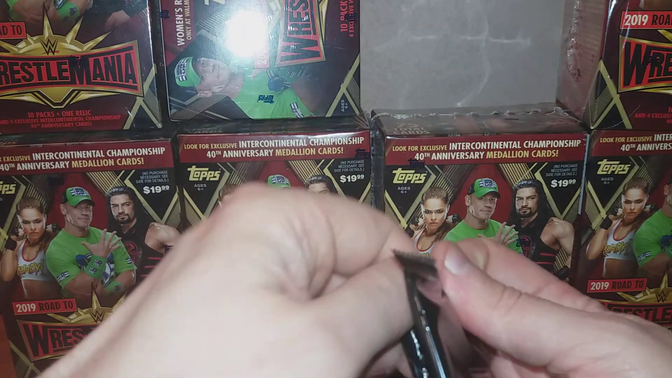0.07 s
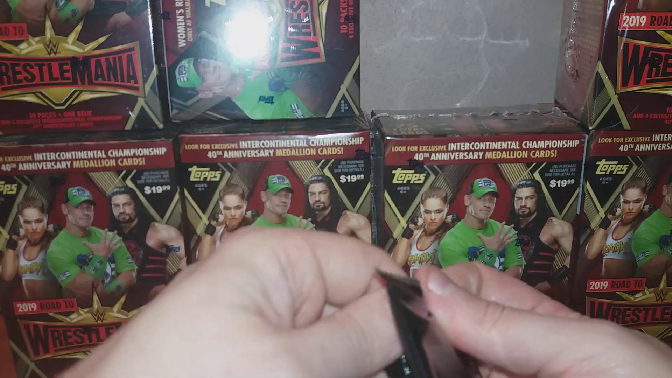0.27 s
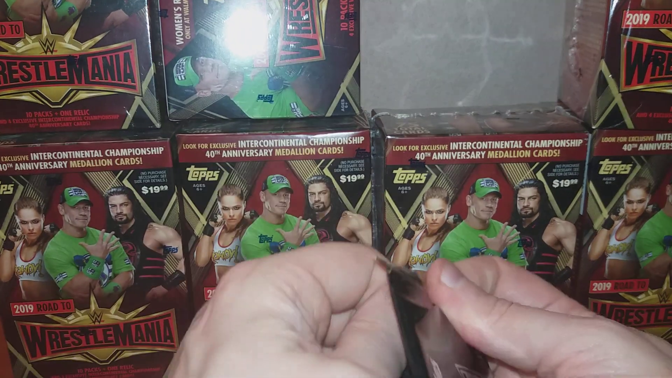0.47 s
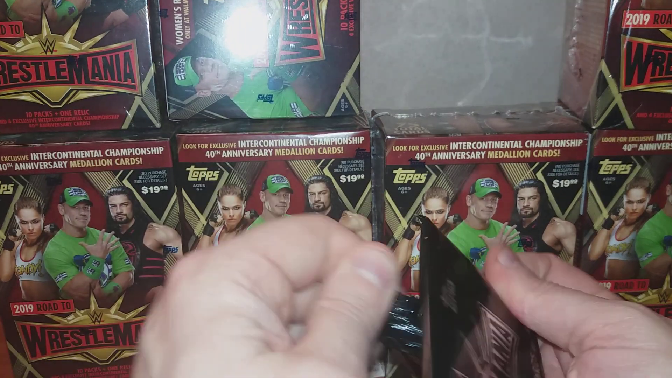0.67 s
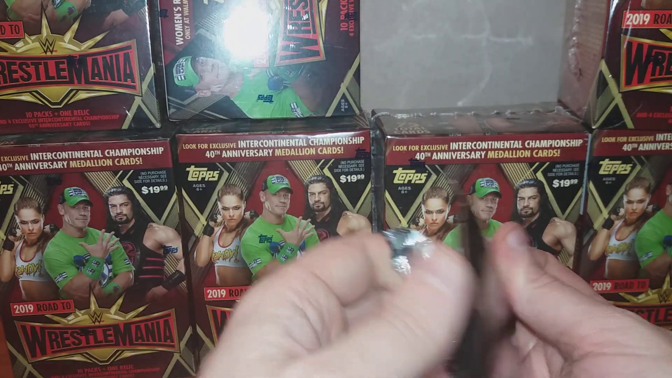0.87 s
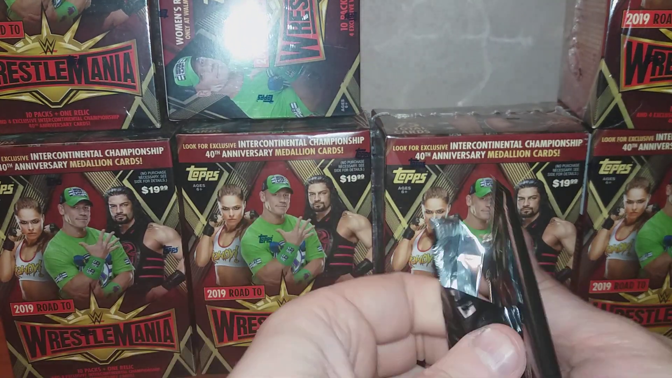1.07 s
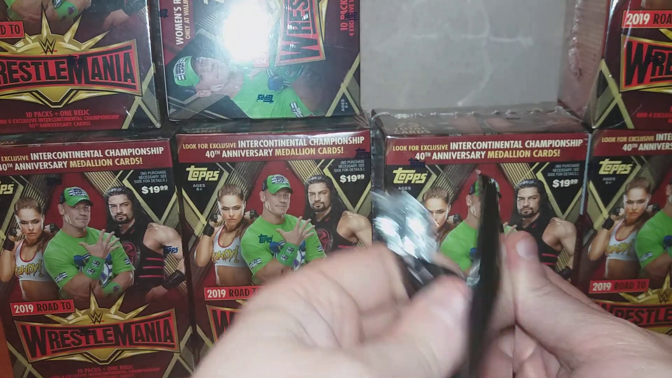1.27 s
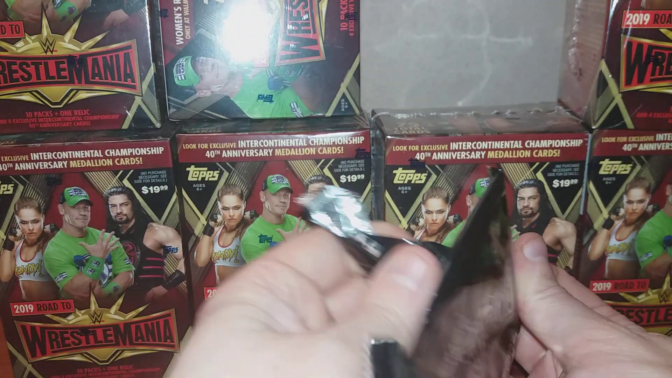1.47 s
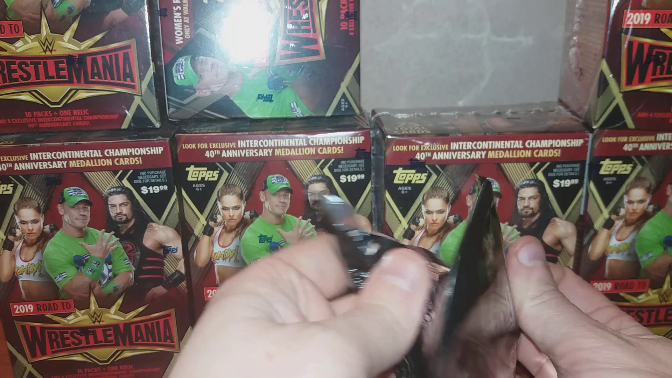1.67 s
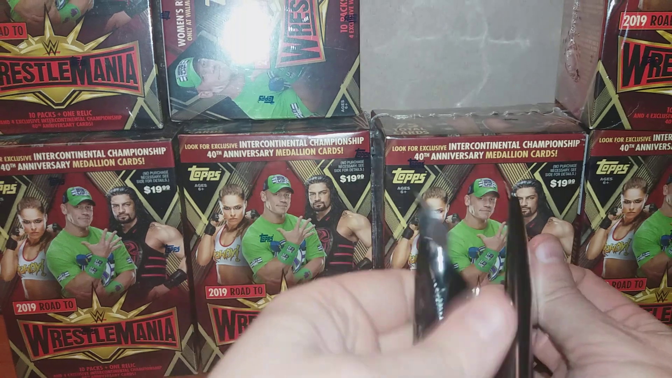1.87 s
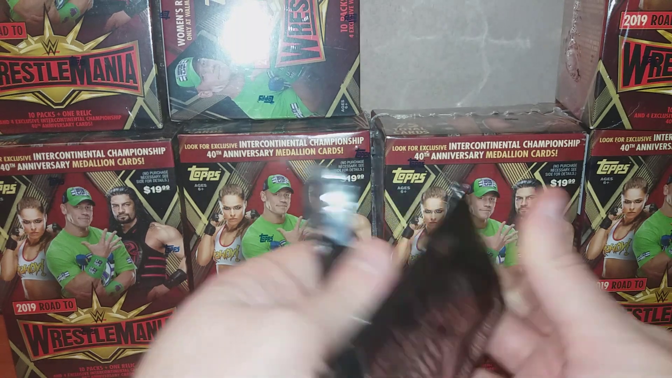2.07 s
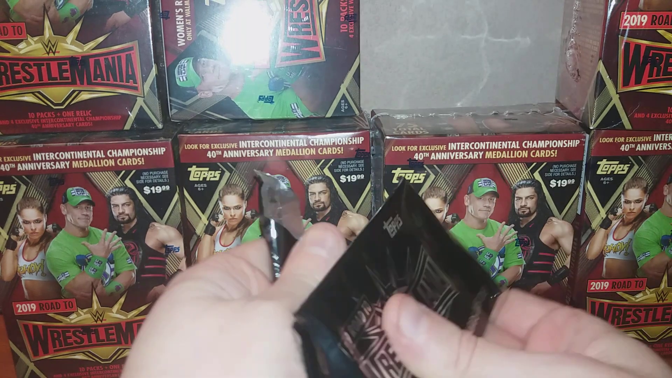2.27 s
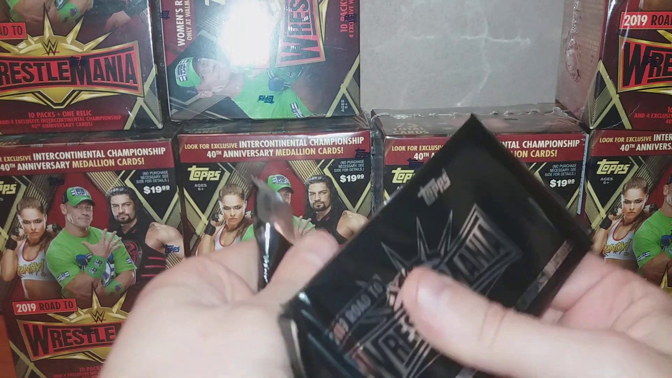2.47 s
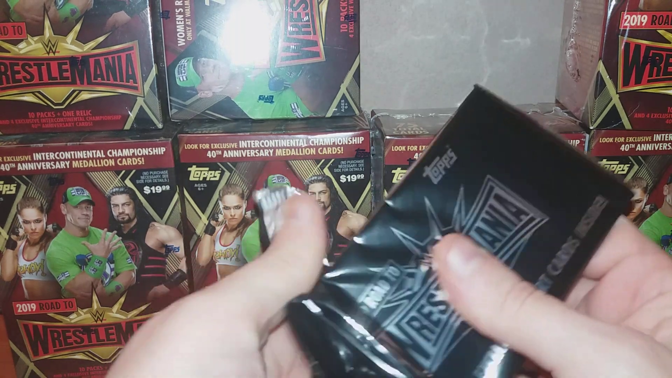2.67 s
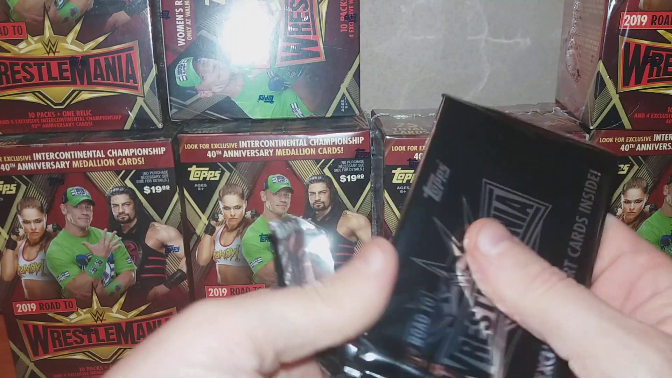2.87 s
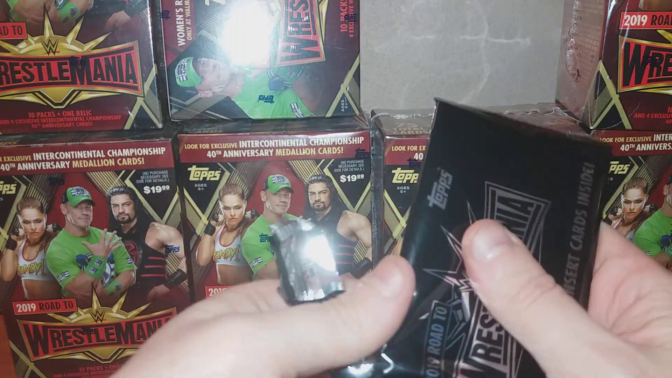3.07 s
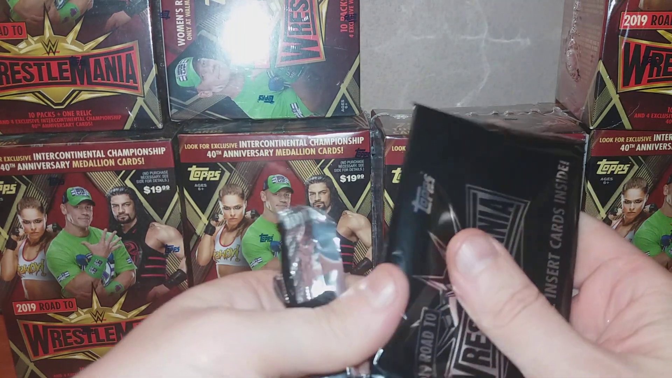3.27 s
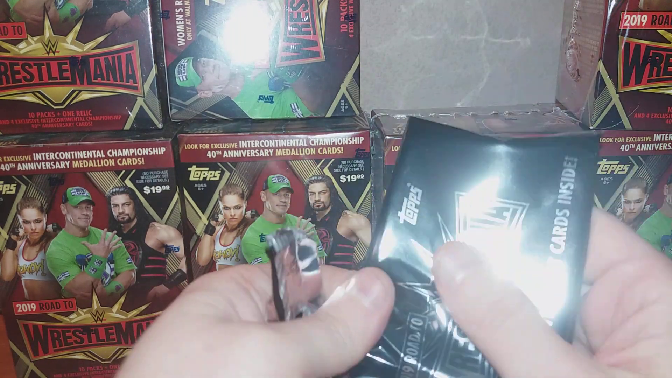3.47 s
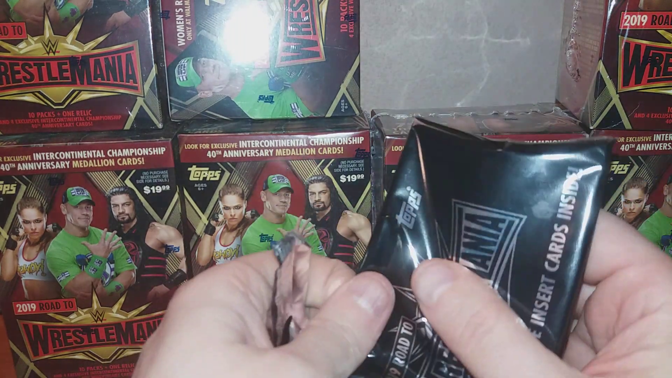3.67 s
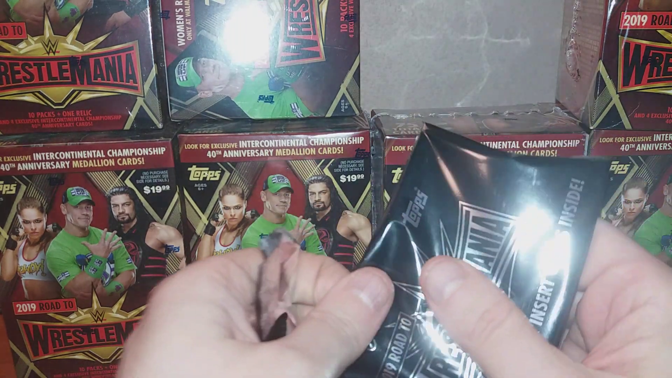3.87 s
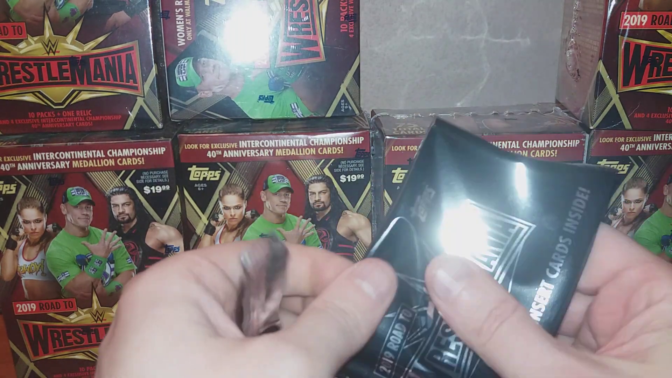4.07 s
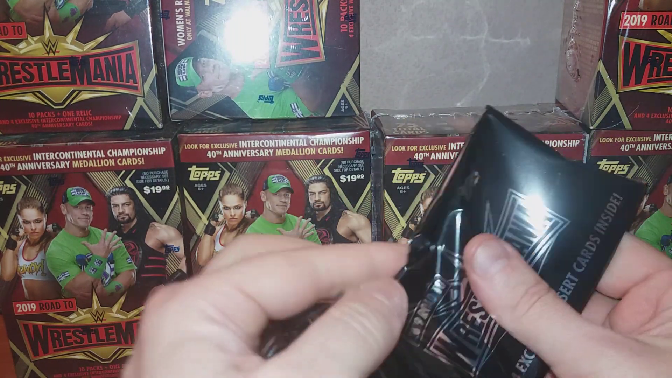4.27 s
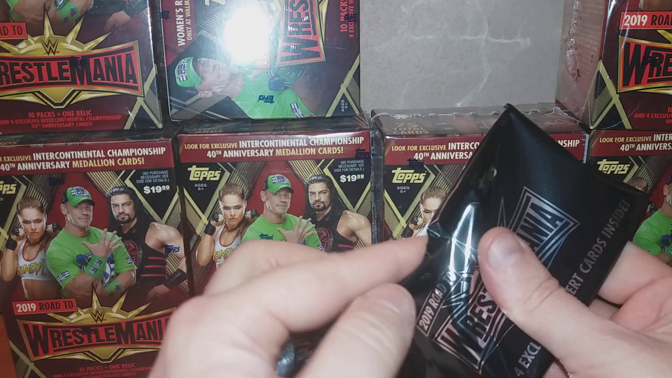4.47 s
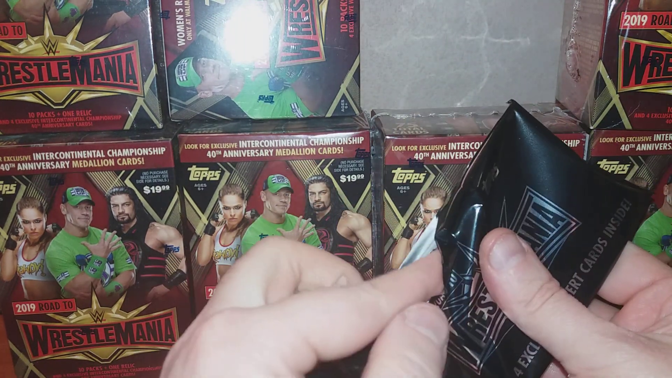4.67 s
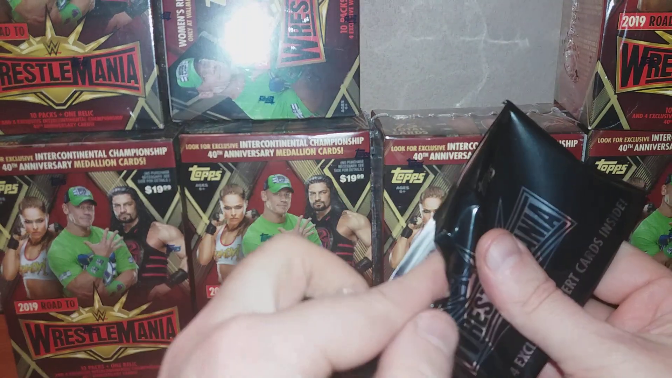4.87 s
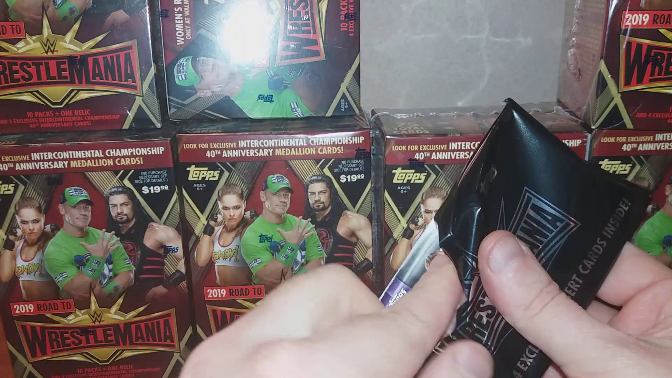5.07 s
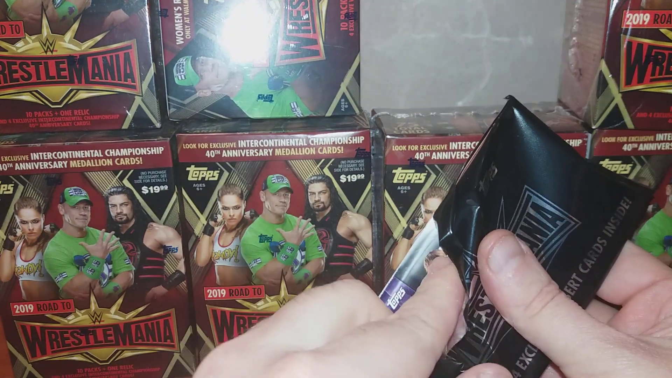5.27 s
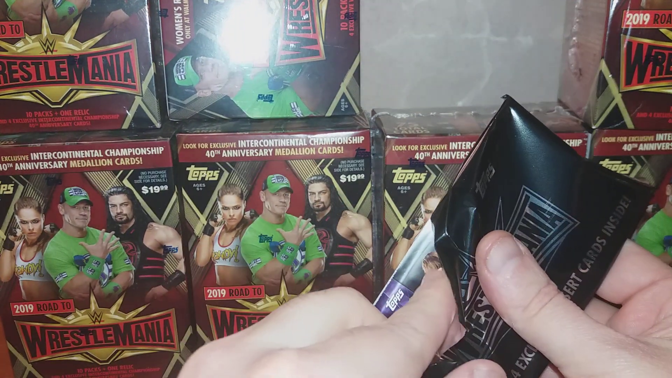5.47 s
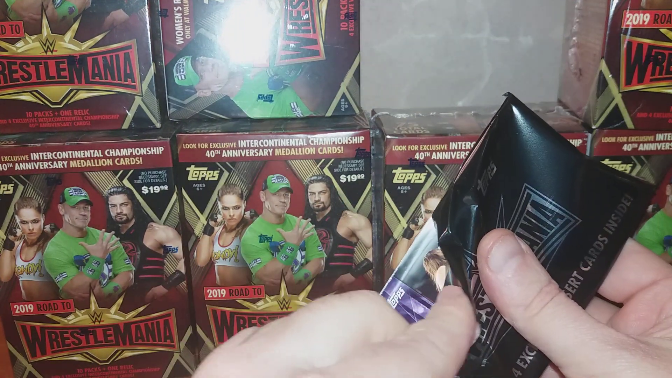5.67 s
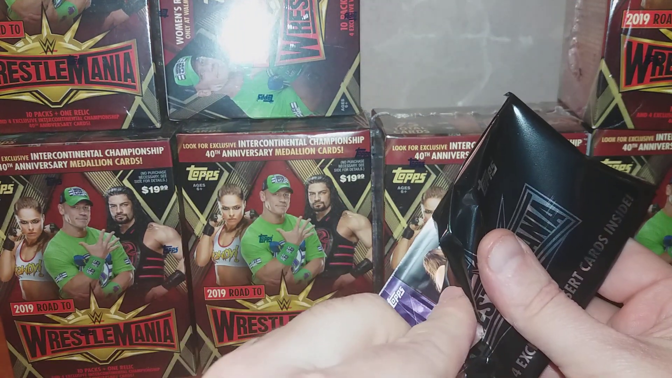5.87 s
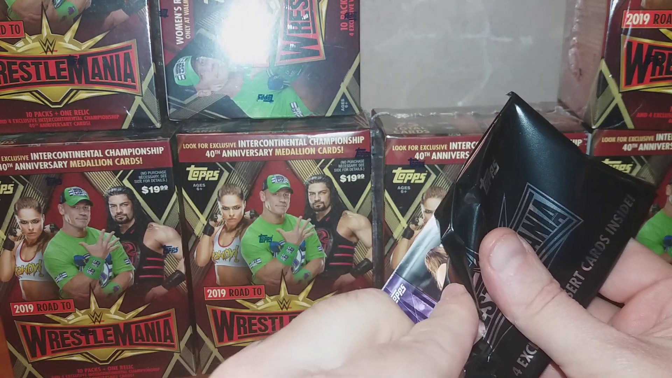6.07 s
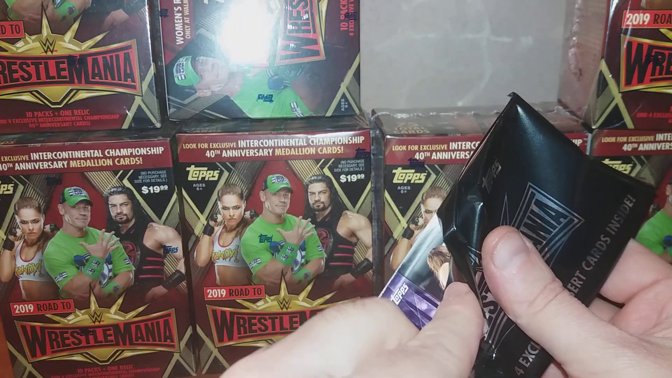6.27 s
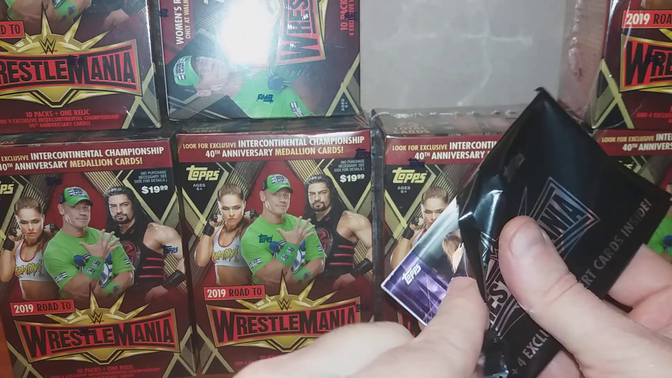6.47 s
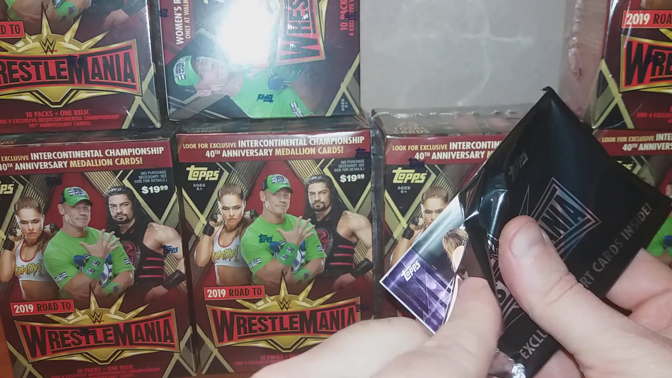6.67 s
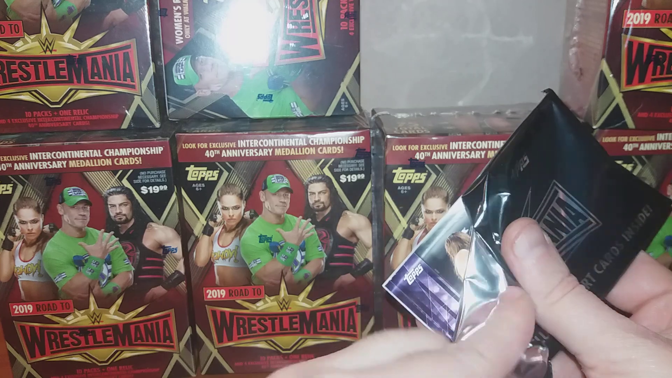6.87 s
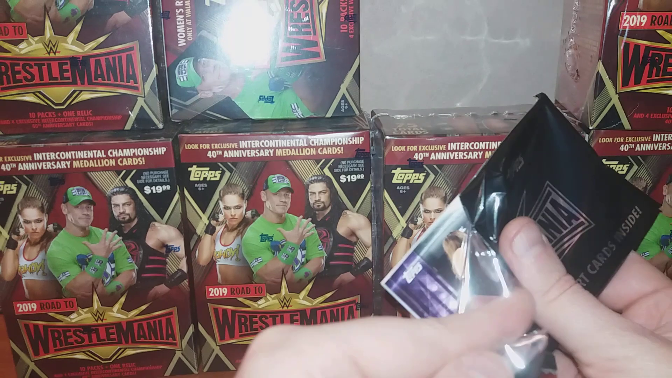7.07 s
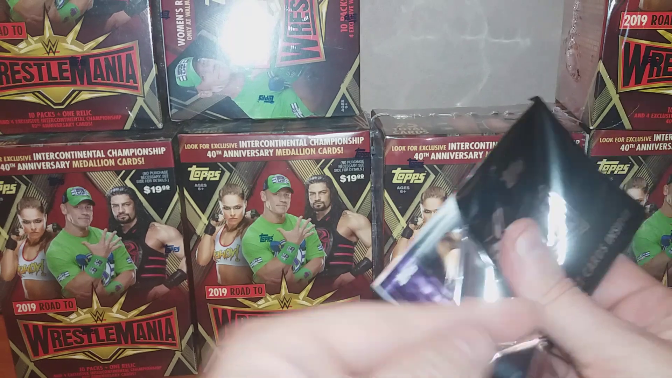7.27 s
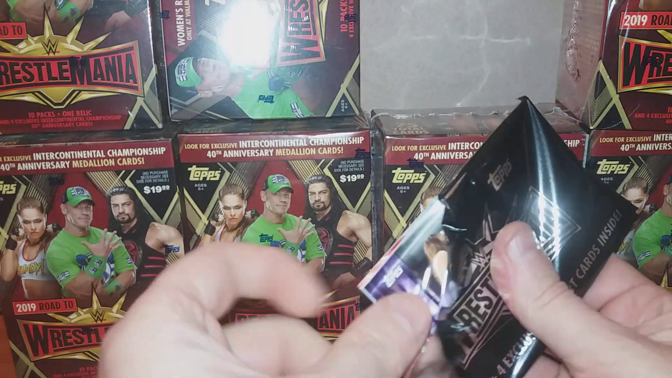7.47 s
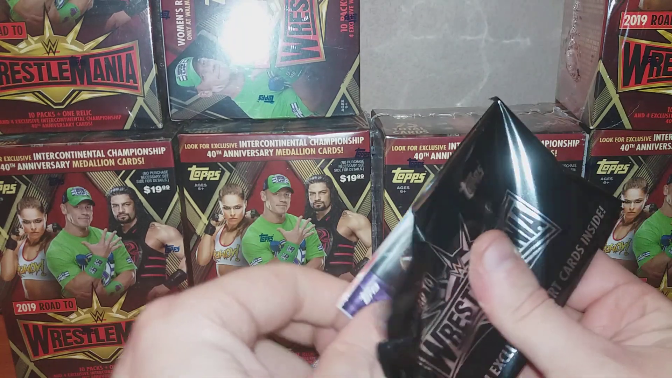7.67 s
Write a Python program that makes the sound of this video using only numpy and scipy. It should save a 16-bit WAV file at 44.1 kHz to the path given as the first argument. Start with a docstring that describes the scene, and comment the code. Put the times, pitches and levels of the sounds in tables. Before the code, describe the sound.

Close up, a foil wrapper crackles under the fingers and tears once, quickly. Sharp snaps and a fine, grainy rustle follow, mixed with light taps on the stack of cards inside. The handling thins out in the second half, where skin squeaks briefly on the foil, and picks up again at the end. The indoor sound is fairly dry, with a faint low rumble and hum from a far appliance.

```python
"""A small foil pack crinkles and tears in the hands, close to a two-port microphone in a quiet room.
Creases in the foil buckle with sharp snaps; between them tiny creases rustle under the fingers.
The foil rips once, fingers knock the card stack and skin squeaks on the wrap.
The room answers the close sounds with a short tail, and an appliance rumbles and hums far off."""
import sys
import numpy as np
from scipy import signal
from scipy.io import wavfile

SR = 44100
rng = np.random.default_rng(int(sys.argv[2]) if len(sys.argv) > 2 else 0)


def log_audio(samples):
    """Write samples as a 16-bit WAV file to the path given in sys.argv[1]."""
    # one column per channel
    frames = np.atleast_2d(samples).T
    # limit to full scale, then quantise
    limited = np.clip(frames, -1, 1)
    pcm = np.round(limited * 32767).astype(np.int16)
    wavfile.write(sys.argv[1], SR, pcm)


N = 340011

# the foil's bass, middle, treble and top ranges:
# (low edge [Hz], high edge [Hz], left-right likeness [0-1], t60 of a soft snap [s], rustle weight [dB])
FOIL_RANGES = [(311, 1400, 0.55, 0.014, -4), (1160, 3160, 0.21, 0.016, 0), (3250, 7450, 0.028, 0.012, -7),
               (7900, 18900, 0.0193, 0.012, -9.5)]


def from_db(db):
    return 10 ** (np.asarray(db) / 20)


def rms_one(x):
    return x / np.sqrt(np.mean(x ** 2) + 1e-20)


def in_time(rows):
    """One curve over the whole scene for each column after the time."""
    times, *columns = np.transpose(rows)
    return [np.interp(np.arange(N) / SR, times, column) for column in columns]


def at_hz(points, hz):
    frequencies, values = np.transpose(points)
    return np.interp(np.log(hz), np.log(frequencies), values)


def band(x, low_hz, high_hz):
    sos = signal.butter(2, [low_hz, min(high_hz, .45 * SR)], "band", fs=SR, output="sos")
    return signal.sosfilt(sos, x)


def resonance(x, hz, width_hz):
    """Two-pole resonance with gain 1 at its peak."""
    r = np.exp(-np.pi * width_hz / SR)
    feedback = [1, -2 * r * np.cos(2 * np.pi * hz / SR), r * r]
    return signal.lfilter(np.array([1, 0, -1]) * (1 - r * r) / 2, feedback, x)


def drift(rate_hz):
    """A smooth random wander with spread 1."""
    r = np.exp(-80 * np.pi * rate_hz / SR)
    slow = signal.lfilter([1], [1, -2 * r, r * r], rng.standard_normal(N // 40 + 2002))[2000:]
    return np.interp(np.arange(N) / 40, np.arange(len(slow)), rms_one(slow))


def stereo(mid, side, alike):
    """Left and right from a shared and an opposed part."""
    shared, opposed = np.sqrt(1 + alike) * mid, np.sqrt(1 - alike) * side
    return np.array([shared + opposed, shared - opposed])


def lay(times, bursts):
    """Adds short stereo bursts (2, events, samples) at their times."""
    size = bursts.shape[2]
    at = (times * SR).astype(int)[:, None] + np.arange(size)
    return np.array([np.bincount(at.ravel(), side.ravel(), N + size)[:N] for side in bursts])


def room_tone(patchy_db):
    """A far appliance: rumble and hiss in half-octave bands, with a wavering hum."""
    # colour of the room tone: (frequency [Hz], relative density [dB])
    spectrum = [(15, -57), (25, -29.5), (41, -36), (59, -6.5), (97, -35.5), (145, 17.5), (175, -11),
                (256, -5.5), (545, -12.5), (591, -44.5), (796, -14.5), (1020, -12), (1130, -22),
                (1230, -18), (16000, -70.5)]
    # its level at the microphone: (time [s], level [dB])
    levels = [(0.0, -48.5), (6.89, -52), (7.71, -49.5)]
    # how alike it reaches the two ports: (frequency [Hz], likeness [0-1])
    likeness = [(30, 0.83), (60, 0.93), (150, 0.87), (300, 0.99), (640, 0.041), (1500, .02)]
    # the hum's narrow bands of noise: (frequency [Hz], level [dB], width [Hz])
    hum_bands = [(59.4, -77, 9.8), (173.5, -59.5, 14.0)]
    rumble, edges_hz = 0, 25 * 2 ** np.arange(0, 9.6, .5)
    white = rng.standard_normal((2, 2, N))
    for k, (low, high) in enumerate(zip(edges_hz, edges_hz[1:])):
        hz = np.sqrt(low * high)
        gain = from_db(at_hz(spectrum, hz) + patchy_db * drift(0.65))
        rumble = rumble + gain * stereo(*band(white[k % 2], low, high), at_hz(likeness, hz))
    hum = sum(from_db(db) * rms_one(resonance(rng.standard_normal(N), hz, width))
              for hz, db, width in hum_bands)
    return from_db(in_time(levels)[0]) * rms_one(rumble) * from_db([[.7], [-.7]]) + hum


def room_tail(x, t60_s, level_db, wall_cut_hz):
    """Dense reflections, dulled by the walls, reach each port a little differently."""
    t = np.arange(SR // 3) / SR
    envelope = from_db(-60 * t / t60_s) * (1 - np.exp(-t / 0.0011))
    tail = stereo(*rng.standard_normal((2, len(t))), alike=0.51) * envelope
    tail = signal.lfilter([1], [1, -np.exp(-2 * np.pi * wall_cut_hz / SR)], tail)
    tail = tail / np.sqrt(np.sum(tail ** 2, axis=1, keepdims=True))
    return from_db(level_db) * signal.fftconvolve(x, tail, axes=1)[:, :N]


def microphone_ports(x):
    """Each port of the microphone resonates and lifts a few ranges."""
    # port resonances: (frequency [Hz], width [Hz], boost [dB])
    left_port = [(604, 4400, 1), (2260, 350, 1.5), (7520, 610, 10), (12030, 3850, 6.5)]
    right_port = [(5330, 3950, 5.64), (6910, 720, 7.5), (15400, 1100, 4.1)]
    out = []
    for channel, peaks in zip(x, (left_port, right_port)):
        for hz, width, boost_db in peaks:
            channel = channel + (from_db(boost_db) - 1) * resonance(channel, hz, width)
        out.append(channel)
    return np.array(out)


def card_knocks(cycles):
    """Fingers knock the card stack: soft low blows, over in a few cycles."""
    # blows on the stack: (time [s], relative level [dB], pitch [Hz])
    blows = [(.878, -30, 410), (1.524, -33, 306), (1.585, -34, 280), (1.853, -30.5, 220), (2.13, -30, 167),
             (3.371, -29, 265), (3.498, -28, 256), (3.896, -33.5, 282), (4.32, -33.5, 258),
             (4.724, -32.5, 333), (5.067, -28.5, 238), (7.221, -34.5, 227)]
    times, level_db, hz = np.transpose(blows)[:, :, None]
    t = np.arange(2048) / SR
    thud = from_db(level_db + 6.5) * np.sin(2 * np.pi * hz * t) * from_db(-60 * t * hz / cycles)
    thud = band(thud, 167, 1200)  # small things radiate no deep bass
    return lay(times[:, 0], np.array([thud, 0.71 * thud]))


def skin_squeaks(waver, third_db, scrape_db):
    """Skin and cards stick and slip on the foil: an unsteady tone, with a puff of scrape at every slip."""
    # slides: (start [s], end [s], first pitch [Hz], last pitch [Hz], level [dB], octave over tone [dB])
    slides = [(5.729, 5.757, 1360, 825, -37.5, -16), (5.747, 5.763, 760, 770, -38.5, -25),
              (5.769, 5.771, 734, 780, -40, -19), (6.43, 6.46, 1022, 1028, -35, -4.5),
              (6.468, 6.481, 1054, 990, -37, -2), (6.493, 6.515, 980, 945, -40, -18),
              (6.511, 6.517, 820, 790, -37.5, -18), (6.845, 6.893, 1060, 1122, -59, 12.5)]
    out = np.zeros(N)
    bend, stutter = 1 + waver * drift(180), from_db(4.0 * drift(220))
    grit = rms_one(band(rng.standard_normal(N), 1800, 6100))
    for start, end, from_hz, to_hz, level_db, octave_db in slides:
        span = slice(int(start * SR), int(end * SR))
        count = span.stop - span.start
        phase = 2 * np.pi * np.cumsum(np.linspace(from_hz, to_hz, count) * bend[span]) / SR
        scrape = from_db(scrape_db) * grit[span] * (1 + np.cos(phase))
        upper = np.sin(2 * phase) + from_db(third_db) * np.sin(3 * phase) + scrape
        envelope = from_db(level_db) * np.sqrt(np.hanning(count))
        out[span] += envelope * (np.sin(phase) + from_db(octave_db) * upper)
    return out * stutter * from_db([[.7], [-.7]])


def finger_effort():
    """The fingers' work in dB, in the treble and the middle range: light contact plus every squeeze."""
    # light contact between squeezes: (time [s], level [dB], middle over treble [dB])
    contact = [(0, -56, 6), (.3, -62.5, 8), (.8, -50.5, -5), (1.05, -55, -13), (1.5, -57, -2),
               (1.9, -48.5, -25), (2.55, -48.5, 3), (2.9, -52, -6), (3.3, -58.5, 3), (3.8, -73.5, 14),
               (4, -62, 1.5), (4.55, -62.5, 3.5), (5, -57, -0.5), (5.38, -75, -7), (5.9, -67, 9.5),
               (6.22, -73.5, 3.5), (6.3, -59.5, 9), (6.73, -74.5, 7), (6.93, -56.5, 7), (7.55, -61.5, 5)]
    # squeezes: (peak time [s], level [dB], 20 dB swell [s], 20 dB fall [s], middle over treble [dB])
    squeezes = [(0.041, -42.5, 0.13, 0.33, -11), (.349, -43, .05, .12, -22), (0.471, -41, 0.037, .1, -4),
                (0.631, -39.5, 0.057, .6, 1.5), (.886, -29.5, 0.099, .12, -4.5),
                (1.137, -39, 0.038, 0.092, -6), (1.242, -47, .06, 0.15, 1), (1.345, -36.5, .08, .17, -5.5),
                (1.537, -32, 0.023, 0.28, -9), (1.605, -39.5, 0.09, 0.11, 3.5),
                (1.656, -37.5, 0.042, 0.087, -2.5), (1.732, -39.5, 0.15, .08, -7.5),
                (1.859, -44.5, 0.22, 0.22, 3), (2.12, -35.5, 0.14, 0.11, 1.5),
                (2.27, -35.5, 0.044, .2, 1.5), (2.405, -29.5, 0.22, .12, -3.5),
                (2.656, -38, .06, 0.13, -5.5), (2.773, -31, .04, .05, -1), (3.058, -35.5, .2, .05, -4),
                (3.141, -46.5, 0.033, 0.2, 1), (3.287, -45, 0.082, 0.11, -4), (3.382, -42.5, .07, .06, 2.5),
                (3.511, -34, 0.055, 0.13, -5), (3.639, -35, .08, 0.1, -4.5),
                (3.826, -47.5, 0.022, 0.076, -2), (3.9, -41, 0.018, 0.027, 2.5),
                (4.192, -43, 0.099, 0.12, -2.5), (4.4, -44.5, 0.26, .13, -0.5),
                (4.744, -42, 0.045, 0.061, 0.5), (5.059, -36.5, .08, .07, -0.5),
                (5.24, -49, 0.18, 0.12, 4.5), (5.422, -49.5, 0.017, 0.024, -0.5),
                (5.542, -51, 0.074, 0.22, 4), (5.733, -49, 0.2, 0.048, 8), (6.452, -43.5, 0.12, 0.2, 4),
                (6.868, -43, .12, 0.19, -1.5), (7.221, -39, 0.12, .2, -6.5),
                (7.38, -34.5, 0.027, 0.11, -4.5), (7.7, -45, .2, .1, -10)]
    t = np.arange(N) / SR
    coarse_t = t[::40]
    touch_db, middle_db = (curve[::40] for curve in in_time(contact))
    power = from_db(2 * np.array([touch_db, touch_db + middle_db]))
    for peak_s, db, swell_s, fall_s, over_db in squeezes:
        away = np.where(coarse_t < peak_s, (peak_s - coarse_t) / swell_s, (coarse_t - peak_s) / fall_s)
        power = power + from_db(2 * (db - 20 * away + np.array([[0], [over_db]])))
    return [np.interp(t, coarse_t, 10 * np.log10(p)) for p in power]


def tiny_creases(per_s, uneven_db, clump_db, grain_s):
    """Tiny creases give way in random clumps, most faintly; one stereo track a range, all in step."""
    onsets = rng.random(N) < per_s * from_db(clump_db * drift(25)) / SR
    sizes = onsets * from_db(uneven_db * np.minimum(rng.exponential(1, N), 4))
    grains = signal.lfilter([1], [1, -np.exp(-1 / (grain_s * SR))], sizes + 1e-18)
    tracks = []
    for low_hz, high_hz, alike, _, weight_db in FOIL_RANGES:
        crackle = stereo(*rng.standard_normal((2, N)), alike) * grains
        tracks.append(from_db(weight_db) * rms_one(band(crackle, low_hz, high_hz)))
    return tracks


def foil_rustle(tick_db_per_db):
    """Fingers and cards slide on the foil: a soft, grainy rub, with dry ticks under hard work."""
    # the pocket of the pack colours the rub: (frequency [Hz], width [Hz], boost [dB])
    pocket = [(770, 98, 9.5), (2060, 370, 1.5)]
    treble_db, middle_db = finger_effort()
    rubs = tiny_creases(per_s=1800, uneven_db=5.0, clump_db=3.5, grain_s=0.0031)
    ticks = tiny_creases(per_s=200, uneven_db=4.0, clump_db=4.0, grain_s=0.00026)
    tick_gain = from_db(-9.5 + tick_db_per_db * (treble_db + 48))
    bass, middle, treble, top = ((rub + tick_gain * tick) / np.sqrt(1 + tick_gain ** 2)
                                 for rub, tick in zip(rubs, ticks))
    body = bass + middle
    body = body + sum((from_db(db) - 1) * resonance(body, hz, width) for hz, width, db in pocket)
    return from_db(middle_db - 5.0) * body + from_db(treble_db - 1.16) * (treble + top)


def foil_rip(ring_hz, ring_width_hz, ring_db):
    """A dense run of small failures along the tear; the strip being torn sings."""
    # course of the tear: (time [s], treble level [dB])
    tear = [(0.637, -52), (0.646, -29), (.655, -28), (0.67, -19.5), (.68, -22.5), (0.694, -26.5),
            (0.704, -30), (.715, -33), (.73, -51)]
    bass, middle, treble, top = tiny_creases(per_s=15000, uneven_db=7.5, clump_db=1.5, grain_s=0.00093)
    crackle = from_db(-9.5) * bass + from_db(-18.0) * middle + treble + from_db(1.5) * top
    ring = from_db(ring_db) * rms_one(resonance(middle, ring_hz, ring_width_hz))
    level_db, = in_time([(tear[0][0] - .005, -120)] + tear + [(tear[-1][0] + .005, -120)])
    return from_db(level_db) * (crackle + ring)


def lesser_snaps(count, crowding, over_effort_db, spread_db):
    """Rows for foil_snaps: lesser creases at random times, crowded where the fingers work hardest."""
    # small flat panels that these creases ring: (pitch [Hz])
    panels_hz = [1150, 1510, 2290, 3400]
    effort_db = finger_effort()[0]
    work = np.cumsum(from_db(crowding * effort_db))
    where, which = rng.random((count, 2)).T
    size, top, pitch, panel, pan = rng.standard_normal((count, 5)).T
    at = np.searchsorted(work, work[-1] * (np.arange(count) + where) / count).clip(0, N - 1)
    hz = np.array(panels_hz)[(which * len(panels_hz)).astype(int)] * (1 + .06 * pitch)
    treble_db = effort_db[at] + over_effort_db + spread_db * size
    return np.transpose([at / SR, treble_db, -4 + 5.0 * top, hz, -7 + 0.86 * panel, 3.5 * pan])


def foil_snaps(crack, rise_s, cycles, ring_db, skirt_db, skirts_db_per_octave):
    """A crease buckles in a fast-dying burst of jolts and briefly rings the flat panel beside it."""
    # the clearest creases: (time [s], relative treble level [dB], top over treble [dB],
    # panel pitch [Hz], panel over treble [dB], left over right [dB])
    clearest = [(0.0082, -24.5, 2, 2070, -5, 1), (0.0303, -19, -14, 2100, -3.5, 3),
                (0.0426, -18, -7, 2180, -13, 2), (0.0626, -30, -5, 1500, 2, -1),
                (0.0724, -17.5, 0.5, 814, -7, 3), (0.1017, -40, -12, 2220, 15.5, 3),
                (0.1141, -14, -2, 2500, -5, 0), (0.133, -22, -20, 2320, 0.5, 0),
                (0.2231, -33.5, -8, 3560, 2, -2), (0.3395, -29, -2, 3400, -4, 2),
                (0.3433, -21, 5.5, 2400, -6, 6.5), (0.3497, -15.5, 3, 3490, -32, 1),
                (0.3755, -29, 1, 2430, 0.5, 0), (0.4127, -20.5, 1, 3450, -27, -3),
                (0.4565, -12, -5, 2720, -6, 5.5), (0.4645, -25, -6, 3400, -16, 2),
                (0.4718, -29, -14, 890, -20, -2), (0.4871, -21, -24, 715, -14, -3),
                (0.5098, -22, -8, 3400, -5, 4), (0.5138, -28, 4, 870, -12, 0),
                (0.5279, -29, -4, 3300, -8.5, 5.5), (0.538, -36, -2, 2400, 7.5, 2),
                (0.5821, -23, -18, 2560, 8.5, 0), (0.6307, -14, -2, 2560, -6, 2.5),
                (0.6461, -14.5, -8, 2540, -3, 5), (0.657, -11, -6, 2480, -10.5, -2),
                (0.684, -20.5, -6, 1600, 7, 2), (0.6905, -18, 5, 2500, -7, 3),
                (0.7192, -28, -5, 2430, -9.5, -11), (0.7305, -22, 1, 795, -15, 0),
                (0.7551, -26, -2, 2400, -8, -3), (0.7766, -27.5, 7, 1420, 6.5, 0),
                (0.803, -23, 12.5, 2900, -1, 3), (0.833, -42, -3, 2300, -1, 2),
                (0.8799, -5, -1, 2440, -4, -0.5), (0.8944, -22, -7, 2190, -6, 0),
                (0.9143, -21, -6, 3480, -11, -1), (1.0484, -21, 0, 2960, 2, 1),
                (1.1251, -17, -26, 2600, -10, 2), (1.1387, -20, -1, 750, -19, -2),
                (1.1728, -16, -1, 3450, -4.5, -2), (1.2281, -21.5, 0, 3470, 5, 0),
                (1.2431, -14.5, -4, 1570, -5, 1.5), (1.3357, -16, 2, 3550, -3, 4),
                (1.3473, -18, 2.5, 3260, -1.5, 0), (1.369, -15.5, -1, 3570, -2, -1),
                (1.5233, -26, -3, 873, 5.5, 3), (1.54, -15.5, 4.5, 3500, 2, -2),
                (1.5698, -23.5, 1, 1550, -3, 1), (1.5803, -20.5, -5, 780, -16, 1),
                (1.6339, -17, 4, 2200, 3.5, 0), (1.6514, -17.5, -1, 2150, -8, 5),
                (1.7098, -20, 6, 3300, -13, 7), (1.7298, -18.5, 3, 1460, -4.5, 3),
                (1.7893, -16.5, -3, 1480, -8, -1.5), (1.8556, -11.5, -5, 5300, -1, 0),
                (1.9154, -29, -4, 2290, 1.5, -2), (1.9756, -25, -4, 1510, 2, -1),
                (2.0214, -32, -13, 2360, 7, 2), (2.0412, -28.5, 16.5, 2820, -17, -2),
                (2.0574, -15.5, -4, 2150, -15, -1), (2.0663, -25, 8, 1620, 8, 0.5),
                (2.0844, -21, -11, 1340, 1.5, 7), (2.1024, -11.5, 2, 2370, -3.5, -7),
                (2.1155, -14.5, -6, 3800, 1, 7), (2.1273, -18, 0, 2340, 1, -2),
                (2.2228, -19, -13, 720, -14.5, -5), (2.2579, -42, -10, 1640, 26, 4),
                (2.2637, -23, -1, 2400, -12, 5), (2.27, -44, -13, 750, 17.5, 9),
                (2.2835, -24.5, -6, 2000, 5.5, 0), (2.2986, -27, -5, 2130, -5.5, -4),
                (2.3248, -15, -1, 4740, -1, 7), (2.346, -12.5, 1, 1090, -7.5, -1),
                (2.3558, -14, -3, 1980, -6, 5), (2.3717, -14, -2, 1560, -1, 2),
                (2.3928, -16, -5, 2300, -8, 5), (2.3988, -22, 2, 824, -1, 4),
                (2.4043, -23, -5, 2200, -1, -11), (2.4118, -12, 1, 2130, -8, 0),
                (2.4468, -20.5, 2, 2330, -1, 2), (2.4673, -16.5, -23.5, 695, -8.5, -2),
                (2.488, -44, -8, 2500, 3, 0), (2.5575, -19.5, 2.5, 1070, -10, 4),
                (2.6116, -24.5, 1, 776, -8.5, 4), (2.645, -22, -17, 2110, -17, 1),
                (2.661, -24.5, 6, 2270, -1, 8), (2.6824, -24, 4, 3380, -6, 2),
                (2.7393, -3.5, -4, 3000, -11.5, -6), (2.9142, -31.5, -11, 3320, 3, 0),
                (2.9483, -11.5, -1, 2100, -7.5, 0), (3.0415, -17.5, -1, 3550, -16, -1),
                (3.1254, -19, -1.5, 3570, 0, 2.5), (3.1551, -18, 6.5, 3620, -9, -1),
                (3.2749, -27, 0, 3320, -6, -3), (3.2857, -21, 5.5, 820, -6, 2),
                (3.3768, -18, -4, 770, -3.5, 0), (3.441, -33, -17, 1090, 3.5, 4),
                (3.4569, -30.5, 9, 1250, 2, 2), (3.4999, -23.5, -1, 630, -7, 7),
                (3.5049, -22, -7, 785, 0.5, 2), (3.5149, -26, -1, 1160, 3, 2),
                (3.5461, -26.5, 13, 2160, 2, 2), (3.5655, -39.5, -4, 960, 9, -1),
                (3.6446, -27, 9, 3190, -9, 2), (3.6535, -36, -4, 620, 3.5, 3),
                (3.685, -37, 11, 2330, -21.5, -2), (3.706, -31, 4, 775, -6, 1),
                (3.7708, -42, -2, 2230, 1.5, 2), (3.8116, -21.5, 6, 3500, -2, -1),
                (3.8896, -30, -8, 2700, -8, -3), (3.8957, -21, -3, 3120, 2, 0),
                (3.9528, -31.5, -2, 2470, -4, 2), (3.961, -37.5, 0, 1150, 4, 4),
                (3.985, -48, -4, 1180, 5, -2), (4.1141, -36.5, 6, 3180, 3.5, 4),
                (4.1993, -23.5, -4, 804, -2, 4), (4.3208, -17, -1, 2340, 2.5, -2),
                (4.331, -31, -4, 2500, -2, -1), (4.388, -7.5, -1, 3420, -8, 2),
                (4.5716, -29.5, -1, 1540, 4.5, -1), (4.6985, -26, 0, 3400, -1, 3),
                (4.7236, -20.5, 3.5, 790, -1.5, -2), (4.7543, -19.5, 2.5, 3270, -14, 5),
                (4.976, -46, -9, 2180, 13, 0), (5.0356, -27, -11, 950, -6, -1),
                (5.0664, -28, 3.5, 890, -6, 1), (5.1271, -22.5, -4, 3130, 2.5, -1.5),
                (5.2218, -14, -11, 1400, -12, 1), (5.266, -34.5, 1, 1810, 8, -2),
                (5.4672, -29, 1.5, 2500, -7, -1), (5.6218, -27.5, -18, 1500, -1.5, -4),
                (5.6734, -37.5, 5, 2180, 14, -3.5), (5.7228, -39, 1, 1790, 3, -8),
                (5.879, -55, -2, 2200, 16, -5), (6.2583, -44, -3.5, 2200, 4.5, 3),
                (6.3945, -46, -8, 800, 12, 0), (6.5419, -31.5, 2, 2040, 9.5, 0),
                (6.5836, -27, -0.5, 1920, -2, 4), (6.595, -34.5, -11, 780, 3, -2),
                (6.614, -31.5, -7, 2040, 0, -2), (6.7544, -27, -7, 2800, 2, -1.5),
                (6.8631, -34, -8, 2190, -6, 0), (6.9736, -16.5, -10, 1360, -7, 0),
                (7.135, -44, -4, 2150, 5, 2), (7.2165, -29, -3, 3500, -8, 0),
                (7.2231, -34.5, -1, 2040, 13, 3), (7.2577, -42.5, -11, 1350, 13, -1),
                (7.2807, -38.5, -7, 2000, 11, 7), (7.2916, -38, -7, 2400, 7, -2),
                (7.299, -28.5, -7, 2310, 5, -2), (7.3275, -27, -8, 804, -8, 2),
                (7.3316, -8, -4, 4800, -5, -5), (7.3696, -15.5, -1, 3430, 0.5, 1),
                (7.376, -28, 3, 1560, 0.5, 14), (7.4236, -28, -4, 2400, -2, 1),
                (7.5342, -33.5, -11, 2200, -0.5, -4), (7.6478, -38, -21, 2000, -2, -10)]
    lesser = lesser_snaps(count=14, crowding=.7, over_effort_db=8, spread_db=3)
    times, treble_db, top_db, panel_hz, panel_db, pan_db = np.vstack([clearest, lesser]).T[:, :, None]
    t = np.arange(1024) / SR
    jolts = rng.standard_normal((len(times), len(FOIL_RANGES), 2, len(t)))
    # the fold flips in one hard jolt, common to all ranges, just under a millisecond in
    flip = jolts[:, :1, :, 0]
    jolts[:, :, :, SR // 1200] = crack * (flip + np.sign(flip) * [1, 0])
    rise = 1 - np.exp(-(t / rise_s) ** 2)
    taut = from_db(0.44 * np.clip(treble_db + 18.5, 0, None))  # taut foil snaps loudly and ends sooner
    # bass and middle are louder the nearer they lie to the panel pitch
    near_db = [panel_db + skirt_db - slope_db * abs(np.log2(panel_hz / np.sqrt(low * high)))
               for (low, high, *_), slope_db in zip(FOIL_RANGES, skirts_db_per_octave)]
    left, right, above, below = rng.normal(0, 1, (len(times), 4)).T[:, :, None]
    phase = 2 * np.pi * panel_hz * t + .5 * np.array([left, right])
    # two weaker neighbouring modes blur the pitch
    upper_mode = 0.41 * np.sin(phase * (1.27 + 0.17 * above))
    lower_mode = -0.3 * np.sin(phase * (0.736 + 0.069 * below))
    modes = np.sin(phase) + upper_mode + lower_mode
    out = from_db(panel_db + ring_db) * rise * modes * from_db(-60 * t * panel_hz / cycles)
    for k, over_db in enumerate(near_db + [0, top_db]):
        low_hz, high_hz, alike, t60_s, _ = FOIL_RANGES[k]
        envelope = rise * from_db(-60 * t * taut / t60_s)
        burst = band(stereo(jolts[:, k, 0], jolts[:, k, 1], alike) * envelope, low_hz, high_hz)
        out = out + from_db(over_db) * burst / np.abs(burst).max(axis=2, keepdims=True)
    gains = from_db(treble_db + np.array([pan_db, -pan_db]) / 2)
    return lay(times[:, 0] - rise_s / 2, out * gains)


def scene():
    """Hands and foil close to the microphone, the room and its far appliance behind them."""
    close = from_db(-2.5) * foil_snaps(crack=5.3, rise_s=0.0008, cycles=17.3, ring_db=2.5,
                                       skirt_db=-0.5, skirts_db_per_octave=[6.5, 2.5])
    close += foil_rustle(tick_db_per_db=0.68)
    close += foil_rip(ring_hz=2550, ring_width_hz=420, ring_db=-7)
    close += card_knocks(cycles=4.3)
    close += skin_squeaks(waver=0.062, third_db=-15, scrape_db=-16.5)
    reflections = room_tail(close, t60_s=0.092, level_db=-16, wall_cut_hz=8000)
    return microphone_ports(close + reflections) + room_tone(patchy_db=2.5)


def record(dry):
    """The highest peaks are rounded; the top is cut, first gently, then steeply."""
    rounded = 1.1 * np.tanh(dry / 1.1)
    softened = signal.sosfilt(signal.cheby2(8, 14, 16000, fs=SR, output="sos"), rounded)
    return signal.sosfilt(signal.cheby2(14, 60, 16700, fs=SR, output="sos"), softened)


dry = scene()
out = record(dry)
log_audio(out)
```